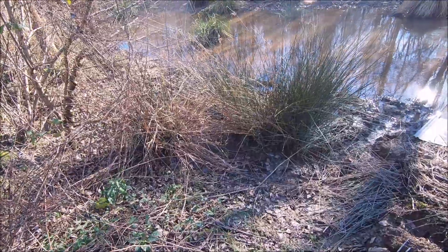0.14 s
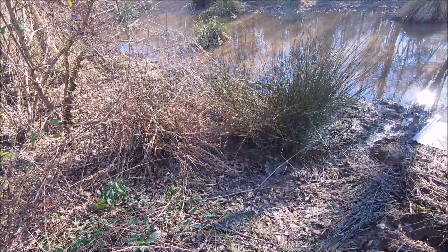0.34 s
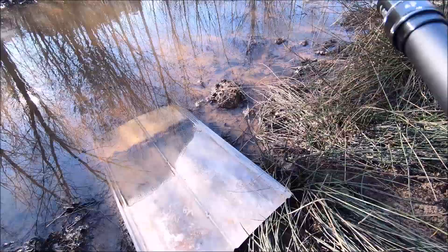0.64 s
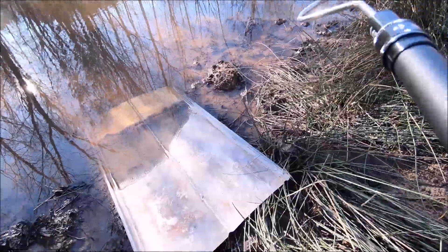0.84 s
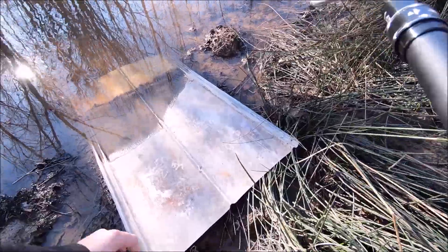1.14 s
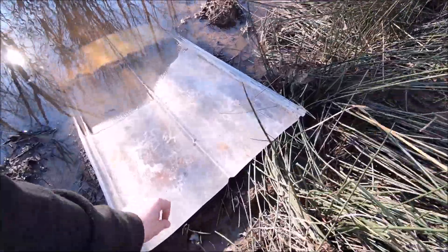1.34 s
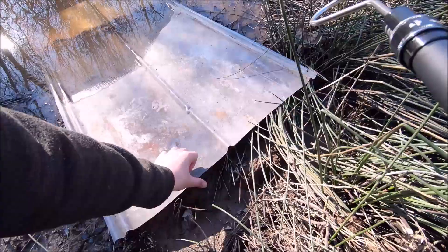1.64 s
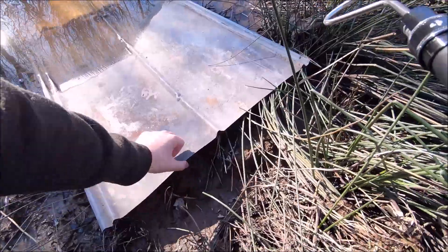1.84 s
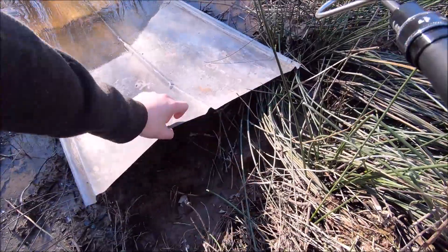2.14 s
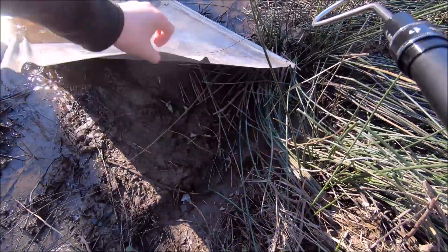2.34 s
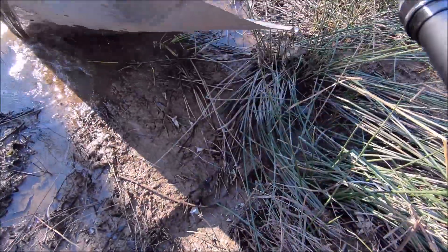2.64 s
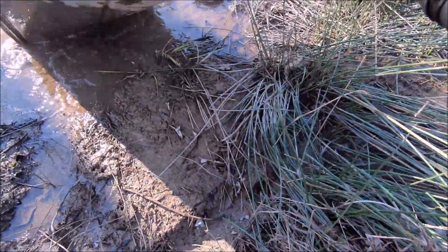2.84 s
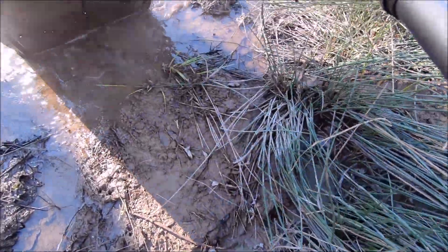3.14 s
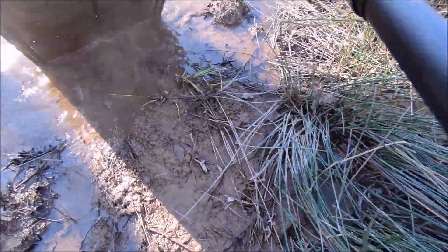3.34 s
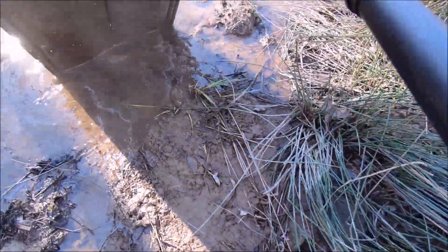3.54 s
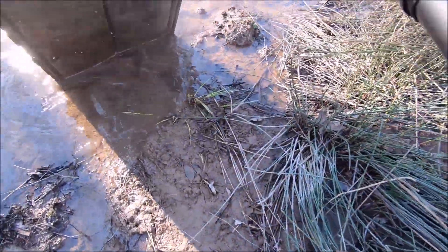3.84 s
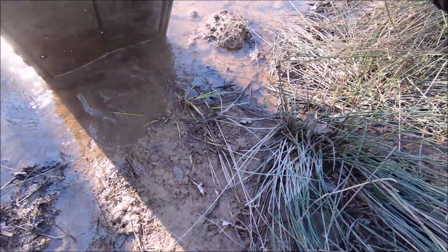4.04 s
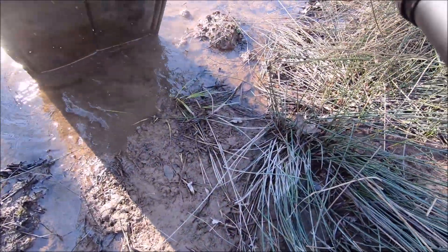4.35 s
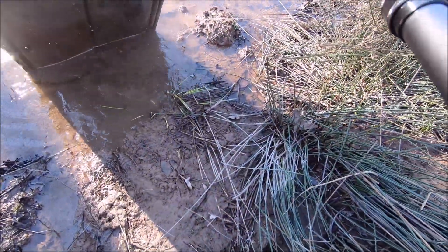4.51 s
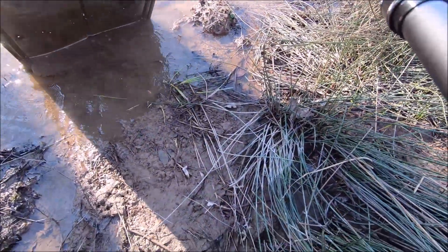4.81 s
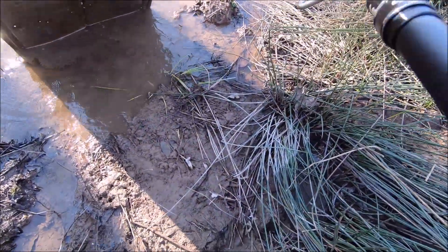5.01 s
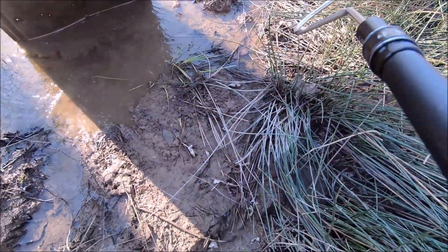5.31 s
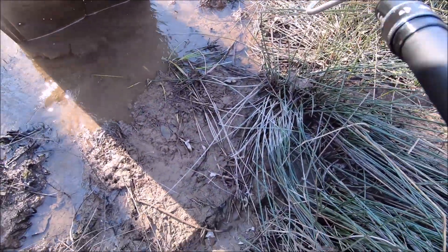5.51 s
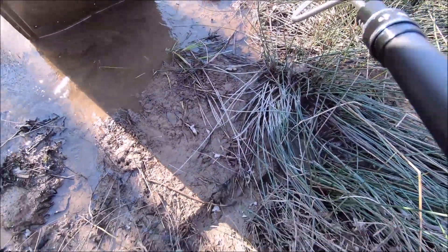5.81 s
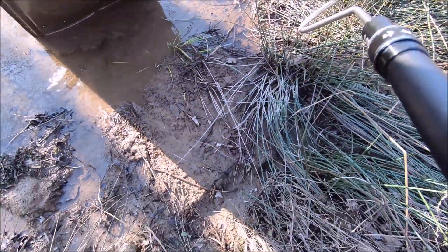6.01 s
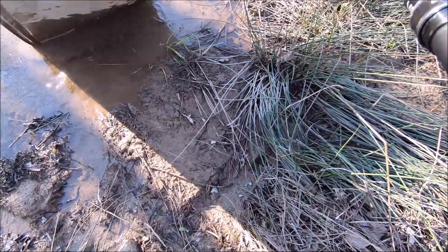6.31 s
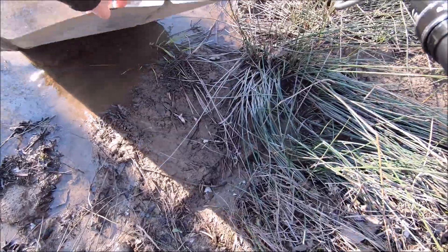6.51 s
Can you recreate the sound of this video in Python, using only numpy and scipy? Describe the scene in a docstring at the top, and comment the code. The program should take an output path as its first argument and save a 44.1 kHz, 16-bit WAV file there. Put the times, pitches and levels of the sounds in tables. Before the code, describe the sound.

Close handheld microphone beside shallow water: rough cloth rubbing and dull knocks, a short gap, then nearly mono sound. Reeds rustle, a thin sheet pops free of mud and booms, with wet plops, crackles and swishing runoff. A second low flexing thud comes later; drips thin out, and the stereo opens again over faint wind and a slow, distant engine.

```python
"""A sleeve brushes and squeaks and low knocks strike at a creek bank, over a slow far engine, wind and open air.
After a short silence the stereo image narrows to mono, and grass rustles as filtered, grainy noise.
A muddy metal sheet is lifted: resonances driven by noise bursts boom, and gliding sines plop and gulp.
Drops (rising sines over splashes), swishes, squeaks and a spatter of tiny bubbles accompany the flexing sheet.
Later the rustle thins, the stereo image widens again, and the engine, a train of smeared pulses, still throbs."""
import sys
import numpy as np
from scipy import signal
from scipy.fft import rfft, irfft, next_fast_len
from scipy.io import wavfile
from scipy.ndimage import uniform_filter1d, map_coordinates

SR = 44100
rng = np.random.default_rng(int(sys.argv[2]) if len(sys.argv) > 2 else 0)


def convert_level_to_amplitude(level_db):
    """Map a level in decibels to its linear amplitude factor."""
    exponent = np.asarray(level_db, float) / 20
    return 10 ** exponent


def master(y):
    """Save y as 16-bit WAV."""
    cut = np.clip(np.atleast_2d(y).T, -1, 1)
    pcm = np.round(cut * 32767)  # scale
    wavfile.write(sys.argv[1], SR, pcm.astype(np.int16))


N = 294014
T = np.arange(N) / SR  # seconds

# Shudders of the sheet. Each row: nominal time in seconds, relative drive in dB, length of repeating in seconds,
# drive of the middle modes and of the high modes, both in dB over the low modes.
JOLTS = [(2.155, -10.5, 0, -3.5, -2.5), (2.165, -18, 0.0054, -13, -0.5), (2.177, -12.5, 0.0058, -1.5, -1.5),
         (2.2, -29.5, 0.026, 4.5, 1), (2.249, -35, 0.0069, 9, -6), (2.263, -28.5, 0.013, 5, -9),
         (2.302, -36, 0.0057, 9.5, -2), (2.33, -30, 0.0089, 2, -0.5), (2.394, -27.5, 0.033, -6, -24),
         (2.434, -16, 0.045, -20, -32), (2.509, -15, 0.00018, -7, -22), (2.548, -18, 0.017, -14.5, -15.5),
         (2.592, -18.5, 0.01, -13.5, -7.5), (2.714, -25.5, 0.0061, -17, -22),
         (3.205, -27, 0.0038, -25, -30), (3.229, -28, 0.021, -29, -36), (3.817, -16.5, 0.06, -14, -40),
         (3.847, -18, 0.015, -9.5, -40), (3.91, -23, 0.028, -16.5, -47.5), (3.955, -30, 0.021, -16, -42),
         (4.044, -31, 0.0054, -13, -28), (5.779, -30, 0.034, -31.5, -31)]
# Low modes of the sheet. Each row: centre in Hz, width in Hz, relative level in dB.
LOW_MODES = [(200, 51, 1.5), (247, 61.6, 3.5), (306.7, 57, -1)]
# Middle modes of the sheet. Each row: centre in Hz, width in Hz, relative level in dB.
MIDDLE_MODES = [(395, 178, -1), (503, 22, 2), (558, 42, -1), (637.6, 24.6, 0.5), (661, 30, -5),
                (810, 65, -5), (900, 400, -14)]
# High modes of the sheet. Each row: centre in Hz, width in Hz, relative level in dB.
HIGH_MODES = [(942, 160, 4.5), (1224, 51, 7), (1414, 200, 0), (1653, 120, 2.5), (2030, 170, -0.5),
              (2150, 130, 1), (2330, 170, -2.5), (2870, 340, -9.5), (3300, 580, -17)]
JOLT_T60_S, JOLT_RISE_S = 0.15, 0.0017  # decay of the low drive; its rise constant
TEAR_DB = 2.5  # how raggedly the mud lets go
# a shudder jolts again, softer on average, with random scatter
REPEAT_S, REPEAT_LOSS_DB, REPEAT_SCATTER_DB = 0.024, 0.9, 1.7
# Short low plops and gulps, gliding in pitch. Each row: start in seconds, peak level in dB, start pitch in Hz,
# end pitch in Hz, length in seconds.
GULPS = [(1.91, -27.5, 330, 450, 0.0089), (4.547, -37.5, 416, 474, 0.0086), (2.279, -25, 336, 420, 0.0096),
         (2.311, -22.5, 420, 450, 0.011), (2.345, -19, 415, 446, 0.015), (2.508, -7, 287, 302, 0.0078),
         (2.418, -16.5, 237, 302, 0.02), (2.428, -11, 300, 340, 0.033), (2.468, -14.5, 344, 297, 0.027),
         (3.812, -13.5, 200, 235, .02), (3.828, -14, 209, 235, 0.024), (3.833, -24, 482, 544, 0.026),
         (3.855, -26, 572, 534, .026), (3.864, -19, 228, 185, 0.041), (3.904, -30, 583, 540, .02),
         (3.949, -25.5, 170, 223, 0.027), (3.907, -24, 213, 200, 0.033)]

# Drops and small snaps. Each row: nominal time in seconds, relative level in dB, pitch in Hz, tone share 0 to 1.
DROPS = [(0.035, -37.5, 6800, 0), (0.057, -32, 1270, 0.7), (0.0773, -37, 7860, 0.54),
         (0.091, -50, 4280, 0.1), (.302, -27.5, 5060, 0.19), (1.075, -37, 3360, 0.57),
         (1.206, -39, 3630, 0.33), (1.239, -33, 3040, 0.5), (1.284, -32.5, 3000, 0.44),
         (1.414, -31.5, 2800, 0.24), (1.5218, -35, 347, 0.52), (1.729, -39, 2800, 0.44),
         (1.741, -42, 2700, .4), (1.7497, -39.5, 4100, 0.65), (1.911, -25, 313, 0.36),
         (1.912, -40.5, 1200, 0.4), (1.981, -40.5, 3040, 0.8), (2.491, -33, 1390, 0.66),
         (2.503, -40, 5060, 0.85), (2.608, -29.5, 6000, 0.55), (2.631, -33, 5100, 0.6),
         (2.648, -36, 6100, .7), (2.72, -49, 8100, .6), (2.812, -42, 5000, .7), (2.835, -31, 5500, 0.32),
         (2.872, -33, 2700, 0.9), (3.063, -38, 7000, 0.45), (2.6466, -27, 2070, 0.6),
         (2.706, -32, 4320, 0.36), (2.7258, -33, 3060, 0.2), (2.687, -31.5, 1020, 0.64),
         (2.712, -29, 790, 0.4), (2.728, -25.5, 780, 0.64), (2.334, -25, 805, .5), (2.394, -35, 650, .4),
         (2.7754, -32.5, 1100, 0.54), (2.8556, -32, 2100, 0.56), (2.9, -37, 2560, 0.3),
         (2.91, -34, 4550, 0.5), (2.9387, -34.5, 3500, 0.4), (2.967, -38, 3130, .54),
         (2.979, -30, 840, 0.83), (3.007, -30.5, 377, 0.5), (3.072, -24.5, 2150, 0.23),
         (3.0954, -23.5, 3140, 0.52), (3.1138, -35, 2820, 0.4), (3.2, -35, 5500, 0.3),
         (3.21, -27, 1470, 0.7), (3.216, -28.5, 3950, 0.22), (3.2638, -33.5, 2520, 1),
         (3.26, -36, 3800, 0.3), (3.2907, -27.5, 2550, 0.2), (3.294, -34, 1270, 0.5),
         (3.353, -37.5, 1290, 1), (3.376, -40, 1730, 0.54), (3.38, -37.5, 3150, 0.44),
         (3.405, -33, 3020, 0.2), (3.408, -23.5, 1250, 0.52), (3.4287, -23, 1856, 0.72),
         (3.4795, -34, 2110, 0.09), (3.5266, -42, 3500, 0.33), (3.538, -47, 1800, 0.1),
         (3.6, -61, 2800, 0.5), (3.661, -37.5, 1420, 0.53), (3.667, -32, 2970, 0.24),
         (3.688, -43.5, 3400, 0.8), (3.704, -34.5, 1510, 0.3), (3.761, -47, 3130, 0.46),
         (3.81, -50, 2500, 0.1), (3.843, -55, 6100, 0.7), (3.937, -51, 6300, 0.7),
         (3.978, -43.5, 4760, 0.8), (4.042, -49, 3000, 0), (3.744, -43, 2800, 0.4),
         (3.898, -40, 3900, 0.26), (3.914, -39, 4120, 0.6), (4.079, -37.5, 2030, 0),
         (4.229, -42, 3970, 0.4), (4.2642, -46.5, 2200, 0.12), (4.3, -48, 3950, 0.43),
         (4.358, -36, 2070, .06), (4.37, -48, 4040, 0.1), (4.548, -35, 425, 0.46), (4.548, -51, 2280, 0.1),
         (4.634, -41.5, 3320, 0.4), (4.6586, -49, 6070, 0.26), (4.999, -51.5, 4670, 0.02),
         (5.603, -51.5, 5500, 0.3), (5.822, -55, 6960, 0.65), (5.974, -51, 4930, 0.48),
         (6.0259, -50, 3450, 0.42), (6.0769, -49, 5000, 0.4), (6.1006, -53, 4400, 0.4),
         (6.126, -49, 5570, 0.8), (6.539, -50, 5330, 0.34)]
DROP_T60_S, DECAY_POWER = 0.025, 0.5  # decay of a 1 kHz drop; higher ones die sooner by this power
SPLASH_TOP_HZ = 5500  # wet splashes are soft; higher drops exceed this
SNAP_DB, SNAP_S, SNAP_HZ = -11.5, 0.0001, 3500  # the sharp first contact of a drop
HOLLOW_DB, HOLLOW_T60_S = -7, 0.09  # drops ring on in the hollow under the sheet

# How busily grass and sleeve move. Each row: time in seconds, level of the dull rustle in dB.
RUSTLE = [(1.3, -53.5), (1.46, -51.5), (1.6, -55.5), (1.85, -60), (2.0, -55.5), (2.07, -47), (2.125, -47),
          (2.21, -61), (2.33, -42.5), (2.39, -46.5), (2.55, -51.5), (2.61, -40), (2.73, -43), (2.8, -46.5),
          (2.88, -49.5), (3.0, -50), (3.05, -53), (3.18, -50), (3.3, -57), (3.44, -51.5), (3.58, -58.5),
          (3.8, -62), (4.12, -62.5), (4.2, -68), (4.45, -72.5), (5.2, -77), (5.45, -71), (5.7, -76.5),
          (6.25, -68.5), (6.36, -73), (6.6, -72.5)]
# Spectrum of the dull rustle. Each row: frequency in Hz, relative density in dB per Hz.
DULL_SPECTRUM = [(300, 4.5), (700, 3.5), (1400, -3.5), (2600, -3), (4500, -8.5), (7000, -28),
                 (12000, -56.5)]
# Spectrum of the bright swish. Each row: frequency in Hz, relative density in dB per Hz.
BRIGHT_SPECTRUM = [(2500, -44), (5000, -2.5), (8000, -4), (10500, -14), (13500, -18), (15500, -53.5)]
SWISH_DB, SWISH_SLOPE = -67.5, 0.73  # bright swish at a rustle of -53.5 dB, and dB gained per dB
PEEL_S, PEEL_DB = 1.98, 15  # from here until the sheet is up, clinging mud weakens the bright swish
WET_S, WET_DB = 2.425, 2  # the sheet is up: bared mud crackles louder by this much
DRAIN_S, SPATTER_DB = (2.8, 4.9), -6.5  # span of the draining spatter; dB over the rustle
SPATTER_HZ, SPATTER_CYCLES = 2800, 18  # middle pitch; cycles in which a bubble falls by 18 dB

# Water and reeds sliding off the sheet. Each row: start in seconds, length in seconds, relative level in dB,
# centre in Hz.
SWISHES = [(2.149, 0.057, -44, 2830), (2.153, .045, -59, 3840), (3.885, .04, -61.5, 3970),
           (4.225, 0.027, -59.5, 3950), (2.308, 0.046, -49.5, 3340), (2.502, 0.041, -28, 900),
           (2.59, 0.042, -32.5, 2800), (2.593, .03, -47, 6400), (2.975, 0.071, -54.5, 6900),
           (4.08, 0.055, -69, 6950), (1.05, 0.58, -57.5, 3500), (2.64, 0.031, -41, 2490),
           (2.696, 0.039, -49, 4470), (2.963, .067, -42.5, 2600), (3.099, 0.088, -37.5, 2680),
           (3.405, 0.018, -45, 2470), (3.41, 0.019, -56.5, 6940), (3.66, 0.0326, -48, 2710),
           (4.08, 0.06, -54, 2540), (4.343, 0.055, -58.5, 2850), (5.33, 0.6, -75.5, 7500),
           (5.34, 0.15, -70, 2770), (5.76, 0.23, -74, 3300), (5.76, .25, -78, 7500), (6.1, 0.25, -68, 3100),
           (6.385, 0.14, -67.5, 1505), (6.39, 0.092, -72, 4500), (6.489, 0.057, -60.5, 1880),
           (6.49, 0.062, -68.5, 4660)]
# Squeaks of the sleeve and, later, of wet surfaces. Each row: start in seconds, length in seconds,
# relative level in dB, centre in Hz.
SQUEAKS = [(.299, 0.022, -40.5, 1390), (.442, 0.045, -45.5, 1450), (.49, 0.1, -56, 1760),
           (.61, 0.087, -54, 1720), (2.134, .025, -43.5, 2720), (2.143, .04, -26.5, 2530),
           (1.405, 0.022, -41, 1260), (1.59, .03, -54, 2340), (2.815, 0.15, -46, 2370),
           (3.1, 0.09, -40, 2770), (3.27, 0.042, -51, 2650), (3.295, 0.028, -56, 1240),
           (2.831, 0.015, -44.5, 5300), (3.099, 0.083, -49.5, 8100), (4.55, 0.6, -72, 2890)]
SWISH_OCTAVES, SQUEAK_OCTAVES = 0.53, 0.18  # standard deviation of the band
SWISH_TOP_HZ, SWISH_GRAIN_DB = 9500, 3  # low-pass corner; roughness
PATCH_DB = 2  # depth of the patches in every broad hiss

# A sleeve brushing the microphone. Each row: start in seconds, end in seconds, left level in dB, right level in dB.
STROKES = [(0, .166, -60.5, -55.5), (0.166, 0.292, -67, -64), (0.303, .318, -41.5, -41.5),
           (0.317, 0.343, -47.5, -42.5), (0.346, 0.378, -45, -50), (0.38, 0.432, -44.5, -43),
           (0.435, 0.475, -43, -43.5), (0.472, 0.571, -55, -53), (.572, 0.61, -76, -66),
           (0.61, 0.674, -54.5, -50.5)]
# Spectrum of the sleeve. Each row: frequency in Hz, relative density in dB per Hz.
SLEEVE_SPECTRUM = [(290, -52), (500, -10.5), (537, -3), (847, -20.5), (909, -8.5), (1090, -17), (1300, 1.5),
                   (1680, -9), (2300, -1.5), (3320, -4), (4500, -4), (8020, -10), (9650, -10.5),
                   (15000, -36)]
WEAVE_HZ, WEAVE_OCTAVES = 7500, 0.36  # firm strokes hiss on the weave: centre, standard deviation
WEAVE_DB, WEAVE_SLOPE = 6, 1.4  # dB over a -41.5 dB stroke, extra dB per dB of stroke
# Knocks through the microphone body. Each row: start in seconds, relative left level in dB,
# relative right level in dB, pitch in Hz.
KNOCKS = [(0.305, -26, -7, 124), (.32, -32, -14.5, 87), (0.457, -20, -49, 24), (0.514, -37, -22.5, 34.6),
          (.575, -23.5, -52, 44), (0.621, -10.5, -20.5, 28.6)]

# Engine speed. Each row: time in seconds, firings per second.
ENGINE_SPEED = [(0, 19.56), (0.7, 20.29), (1, 17.44), (1.6, 17.04), (2.4, 17.84), (3.1, 16.99),
                (4.05, 19.38), (5.1, 17.06), (5.3, 19.3), (5.7, 17.96), (6.05, 20.12), (6.4, 18.0),
                (6.67, 18.24)]
# The engine swells and sinks on the air. Each row: time in seconds, level of the pulses in dB.
ENGINE_LEVEL = [(0, -41), (.65, -42), (1.2, -37), (2.1, -35.5), (2.65, -37.5), (3.5, -43), (4.5, -38),
                (4.86, -44), (5.4, -41), (6.4, -43.5), (6.67, -40)]
# Spectrum of the distant exhaust. Each row: frequency in Hz, relative level in dB.
EXHAUST_SPECTRUM = [(20, -23.5), (45, -14), (80, -10), (100, -1.5), (122, 1.5), (140, 0.5), (160, -13),
                    (180, -22), (220, -11.5), (270, -23), (400, -35), (800, -76)]
FIRST_FIRING_S = 0.042
# Spectrum of wind on the microphone ports. Each row: frequency in Hz, relative density in dB per Hz.
WIND_SPECTRUM = [(15, -18), (40, -6.5), (70, -6.5), (110, -12.5), (250, -33), (500, -49.5)]
WIND_DB, GUST_DB, GUSTS_PER_S = -41.5, 1, 5.7
# Spectrum of the open air. Each row: frequency in Hz, relative density in dB per Hz.
AIR_SPECTRUM = [(100, -25), (170, -3), (229, -10), (459, -25.5), (734, -19), (954, -27), (1470, -28),
                (1940, -42), (4600, -42.5), (9750, -76), (15000, -71.5)]
AIR_DB = -55
# Stereo width. Each row: time in seconds, gain of the side signal in dB.
WIDTH = [(0, 0), (.8, 1), (.9, -52.5), (1.5, -77), (4.1, -54.5), (4.3, -12.5), (4.9, -3), (6.67, -1)]
CUT_S, RESUME_S, FADE_IN_S = 0.6835, 0.92, 0.2  # silence begins, silence ends, length of the fade in


def unit(x):
    """Normalization to a root-mean-square value of 1."""
    return x / np.sqrt(np.mean(x ** 2) + 1e-20)


def curves(rows):
    """Linear interpolation in time: one value per sample for each column after the time."""
    s, *cols = np.transpose(rows)
    return [np.interp(T, s, c) for c in cols]


def wobble(rate):
    """Slow modulation: a smooth random curve through rate knots a second."""
    coarse = T[::16]
    knots = rng.standard_normal(int(N * rate / SR) + 4)
    return np.interp(T, coarse, map_coordinates(knots, [coarse * rate]))


def filtered(x, response):
    """Linear filtering: the spectrum of x times a response of frequency."""
    m = next_fast_len(N + 8192, True)
    return irfft(rfft(x, m) * response(np.fft.rfftfreq(m, 1 / SR)), m)[..., :N]


def colour(points):
    """Spectral shaping: gain from (Hz, dB) points on a log frequency axis."""
    f, db = np.transpose(points)
    return lambda hz: convert_level_to_amplitude(np.interp(np.log(hz + 1), np.log(f), db, left=-120, right=-120))


def bell(hz, centre_hz, octaves):
    """Band-pass response, Gaussian on a log frequency axis."""
    return np.exp(-0.5 * (np.log2((hz + 1) / centre_hz) / octaves) ** 2)


def modes(table):
    """Modal superposition: a causal sum of resonances of alternating sign."""
    def response(f):
        return sum((-1) ** k * convert_level_to_amplitude(db) * 1j * f * width / (centre * centre - f * f + 1j * f * width)
                   for k, (centre, width, db) in enumerate(table))
    return response


def patchy(x, depth_db):
    """Random gain over time and frequency, leaving louder and softer patches."""
    z = signal.stft(x, nperseg=256)[2]
    field = uniform_filter1d(rng.standard_normal(z.shape[1:]), size=5, axis=0)
    field = uniform_filter1d(field, size=8, axis=1)
    return signal.istft(z * convert_level_to_amplitude(depth_db * unit(field)), nperseg=256)[1][:, :N]


def hiss(points, alike, grain_db, rate):
    """Partly correlated stereo noise of rms 1, made grainy by a fast random gain."""
    noise = patchy(rng.standard_normal((2, N)), PATCH_DB) * convert_level_to_amplitude(grain_db * wobble(rate))
    turn = np.arccos(np.clip(alike, 0, 1)) / 2
    mid, side = filtered(noise, colour(points)) * [[np.cos(turn)], [np.sin(turn)]]
    return unit(np.array([mid + side, mid - side]))


def add(track, s, sound):
    """Superposition: mixes a sound in at time s."""
    part = track[..., round(s * SR):round(s * SR) + sound.shape[-1]]
    part += sound[..., :part.shape[-1]]


def sheet():
    """Forced resonance: ragged, dying bursts drive the low, middle and high modes of a plate."""
    shakes, t = np.zeros((3, N)), T[:SR // 5]
    fall = -60 * t / JOLT_T60_S * [[1], [1.15], [1.5]]  # high modes die sooner
    for s, db, length, middle_db, high_db in JOLTS:
        shudder = convert_level_to_amplitude(db + fall + [[0], [middle_db], [high_db]]) * (1 - np.exp(-t / JOLT_RISE_S))
        for k in range(4):
            noise = rng.standard_normal((3, len(t)))
            tear = uniform_filter1d(rng.standard_normal(len(t)), size=100) * 10
            push = 2.0 * np.exp(-t / 0.0012)  # a firm push leads
            shake = noise * convert_level_to_amplitude(TEAR_DB * tear) + push
            scatter_db = REPEAT_SCATTER_DB * rng.normal() * (k > 0)
            present = np.clip(1 + length / REPEAT_S - k, 0, 1)
            strength = convert_level_to_amplitude(-scatter_db - REPEAT_LOSS_DB * k) * present
            add(shakes, s - 0.003 + k * REPEAT_S, strength * shudder * shake)
    boom = convert_level_to_amplitude(16.5) * filtered(shakes[0], lambda hz: modes(LOW_MODES)(hz) / (1 + (hz / 600) ** 4))
    middle = convert_level_to_amplitude(21.5) * filtered(shakes[1], modes(MIDDLE_MODES))
    clang = convert_level_to_amplitude(10) * filtered(shakes[2], lambda hz: modes(HIGH_MODES)(hz) / (1 + (hz / 4300) ** 8))
    damped = filtered(boom + middle, lambda hz: 1 / (1 + (hz / 1100) ** 5))  # mud damps the top
    return damped + clang


def gulps():
    """Frequency glide: each short low plop or gulp is a sine swelling and sinking as its pitch moves."""
    out, t = np.zeros(N), T[:SR // 5]
    for s, db, start_hz, end_hz, length in GULPS:
        u = np.clip(t / length, 0, 1)
        cycles = np.cumsum(start_hz + (end_hz - start_hz) * u) / SR
        add(out, s, convert_level_to_amplitude(db) * np.sin(np.pi * u) ** 1.17 * np.sin(2 * np.pi * cycles))
    return out


def drops():
    """Bubble resonance: a decaying tone rises a little over a short splash centred near that pitch."""
    out, t = np.zeros((2, N)), T[:SR // 14]
    snap = (t / SNAP_S) ** 2 * np.exp(2 - 2 * t / SNAP_S) * np.sin(2 * np.pi * SNAP_HZ * t)
    for s, db, hz, tone in DROPS:
        tone = np.clip(tone, 0, 1)
        t60 = DROP_T60_S * (1000 / hz) ** DECAY_POWER
        fall = convert_level_to_amplitude(db + 2.5 - 60 * t / t60) * (1 - np.exp(-t / 0.00062))
        bubble = np.sin(2 * np.pi * hz * t * (1 + 3 * t))
        spread = 2.1 - 1.1 * tone ** 0.5  # the purer the drop, the narrower its splash
        top_hz = min(hz * spread + 50, max(SPLASH_TOP_HZ, 1.25 * hz))
        band = signal.butter(3, [hz / spread, top_hz], "bandpass", fs=SR)
        noise = rng.standard_normal((3, len(t)))
        noise = noise[0] + 0.55 * noise[1:]  # partly shared by the two channels
        splash = signal.lfilter(*band, fall * noise) / signal.lfilter(*band, noise).std()
        contact = convert_level_to_amplitude(db + SNAP_DB) * (1 - tone) * snap
        add(out, s - 0.0015, tone * fall * bubble + 0.7 * (1 - tone) * splash + contact)
    hollow = unit(rng.standard_normal(len(t)) * convert_level_to_amplitude(-60 * t / HOLLOW_T60_S)) / np.sqrt(len(t))
    return out + convert_level_to_amplitude(HOLLOW_DB) * signal.fftconvolve(out, hollow[None], axes=1)[:, :N]


def rustle():
    """Friction noise: blades rub in many tiny scrapes, and wet mud crackles in step with them."""
    dull_db, = curves(RUSTLE)
    wet_db = WET_DB * np.clip((T - WET_S) / 0.15, -1, 0)
    clinging = np.clip(np.minimum(T - PEEL_S, WET_S - T) / 0.13, 0, 1)
    bright_db = SWISH_DB + SWISH_SLOPE * (dull_db + 53.5) - PEEL_DB * clinging
    dull = hiss(DULL_SPECTRUM, alike=0.36, grain_db=-1.0, rate=120)
    wet = 0.5 * convert_level_to_amplitude(wet_db) * crackle()
    bright = hiss(BRIGHT_SPECTRUM, alike=0.059, grain_db=2.5, rate=62)
    motion = (T > CUT_S) * convert_level_to_amplitude(1.4 * wobble(24.05))
    return motion * (convert_level_to_amplitude(dull_db) * (dull + wet + convert_level_to_amplitude(SPATTER_DB) * spatter()) + convert_level_to_amplitude(bright_db) * bright)


def crackle():
    """Bubble resonance: small mud bubbles at random times, few loud and many faint, scaled to rms 1."""
    when, pitch, size = rng.random((2400, 3)).T[:, :, None]
    t, hz = T[:240], 1300 * 5 ** pitch
    decay = convert_level_to_amplitude(-5 * np.log(size + 0.04) - 6.6 * hz * t) * (1 - np.exp(-0.7 * hz * t))
    grains = decay * np.sin(2 * np.pi * hz * t) * (1000 / hz) ** 0.54
    places = (when * N).astype(int) + np.arange(len(t))
    return unit(np.bincount(places.ravel(), grains.ravel(), N)[:N])


def spatter():
    """Bubble resonance: hundreds of tiny bubbles, few loud and many faint, rise in pitch as they die."""
    when, pitch, size = rng.random((900, 3)).T[:, :, None]
    t, hz = T[:900], SPATTER_HZ * 4.5 ** (pitch - 0.5)
    u = hz * t / SPATTER_CYCLES
    decay = convert_level_to_amplitude(-6 * np.log(size + 0.023) - 18 * u) * (1 - np.exp(-12 * u))
    grains = decay * np.sin(2 * np.pi * hz * t * (1 + 0.06 * u)) * (SPATTER_HZ / hz) ** 1.5
    start = (DRAIN_S[0] + when * (DRAIN_S[1] - DRAIN_S[0])) * SR
    places = start.astype(int) + np.arange(len(t))
    out = np.bincount(places.ravel(), grains.ravel(), N)[:N]
    return out / out[round(DRAIN_S[0] * SR):round(DRAIN_S[1] * SR)].std()


def swishes_and_squeaks():
    """Sliding friction: short bands of noise, broad for swishes and narrow for squeaks."""
    out, t = np.zeros((2, N)), T[:SR // 2]
    hz = np.fft.rfftfreq(len(t), 1 / SR)
    for rows, octaves in (SWISHES, SWISH_OCTAVES), (SQUEAKS, SQUEAK_OCTAVES):
        for s, length, db, centre_hz in rows:
            spectrum = rfft(rng.standard_normal((2, len(t)))) * bell(hz, centre_hz, octaves)
            noise = unit(irfft(spectrum, len(t)))
            u = np.clip(t / max(length, 0.005), 0, 1)
            swell = np.abs(np.sin(np.pi * u ** 0.5)) ** 0.64 * (u < 1)
            grain = uniform_filter1d(rng.standard_normal(len(u)), size=80) * np.sqrt(80)
            add(out, s, convert_level_to_amplitude(db + SWISH_GRAIN_DB * grain) * swell * noise)
    return filtered(out, lambda hz: 1 / (1 + (hz / SWISH_TOP_HZ) ** 12))


def sleeve():
    """Friction of cloth: strokes of noise with abrupt ends, the firm ones hissing on the weave."""
    stroke_db = np.full((2, N), -120.0)
    for start, end, left_db, right_db in STROKES:
        stroke_db[:, round(start * SR):round(end * SR)] = [[left_db], [right_db]]
    weave = unit(filtered(rng.standard_normal((2, N)), lambda hz: bell(hz, WEAVE_HZ, WEAVE_OCTAVES)))
    firm = convert_level_to_amplitude(stroke_db + WEAVE_DB + WEAVE_SLOPE * (stroke_db + 41.5))
    noise = hiss(SLEEVE_SPECTRUM, alike=0.035, grain_db=0.2, rate=200)
    cloth = uniform_filter1d(convert_level_to_amplitude(stroke_db), size=300) * noise
    return convert_level_to_amplitude(2.4 * wobble(24)) * (cloth + uniform_filter1d(firm, size=300) * weave)


def knocks():
    """Damped impulse: one low push and its rebound, opposite in sign at the two ports."""
    out, t = np.zeros((2, N)), T[:SR // 5]
    for s, left_db, right_db, hz in KNOCKS:
        u = hz * t
        push = 3.43 * u * np.exp(-1.6 * u * u) * np.sin(2 * np.pi * u)
        add(out, s, convert_level_to_amplitude([[left_db], [right_db]]) * [[-1], [1]] * push)
    return out


def engine():
    """Pulse-train excitation: one exhaust pulse per firing, smeared by distance, with noise around it."""
    level_db, fired = curves(ENGINE_LEVEL)[0], np.cumsum(curves(ENGINE_SPEED)[0]) / SR
    fired = fired - np.interp(FIRST_FIRING_S, T, fired)
    chance = rng.standard_normal((int(fired[-1]), 2))
    times = np.interp(np.arange(len(chance)), fired, T) + 0.0017 * chance[:, 0]  # jitter in seconds
    pulses = np.bincount(np.round(times * SR).astype(int), convert_level_to_amplitude(0.81 * chance[:, 1]), N)[:N]
    throb = unit(filtered(pulses, colour(EXHAUST_SPECTRUM)))
    return convert_level_to_amplitude(level_db) * (throb + 0.66 * hiss(EXHAUST_SPECTRUM, alike=1.0, grain_db=0.0, rate=13))


def wind():
    """Turbulence: low noise with slow gusts, largely shared by the two ports."""
    return convert_level_to_amplitude(WIND_DB) * hiss(WIND_SPECTRUM, alike=0.84, grain_db=GUST_DB, rate=GUSTS_PER_S)


def open_air():
    """Diffuse field: a faint, steady, weakly correlated background noise."""
    return convert_level_to_amplitude(AIR_DB) * hiss(AIR_SPECTRUM, alike=0.39, grain_db=0.2, rate=10)


def scene():
    """Superposition of all the sources at the bank."""
    background = engine() + wind() + open_air()
    return background + rustle() + swishes_and_squeaks() + sleeve() + sheet() + gulps() + drops() + knocks()


def fade():
    """Amplitude gating: full level, then silence, then a fade in."""
    return (T < CUT_S) + np.clip((T - RESUME_S) / FADE_IN_S, 0, 1) ** 0.88


def band_limit(x):
    """A steep low-pass at the top of the band."""
    return signal.sosfilt(signal.butter(12, 15660, fs=SR, output="sos"), x)


def record(dry):
    """Mid-side stereo: the side gain sets a changing width, and the gate leaves a silence."""
    mid = (dry[0] + dry[1]) / 2
    side = (dry[0] - dry[1]) / 2 * convert_level_to_amplitude(curves(WIDTH)[0])
    mix = np.array([mid + side, mid - side]) * fade()
    return band_limit(mix)


dry = scene()
out = record(dry)
master(out)
```